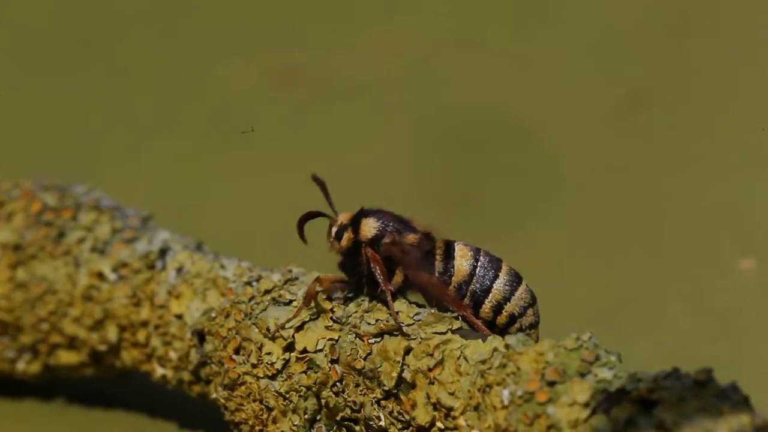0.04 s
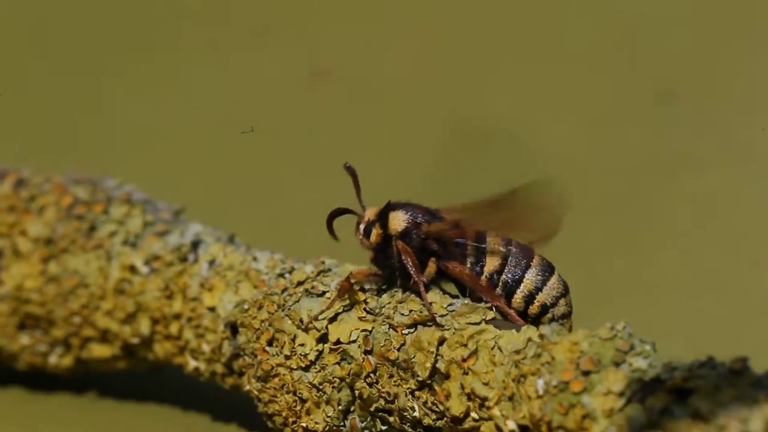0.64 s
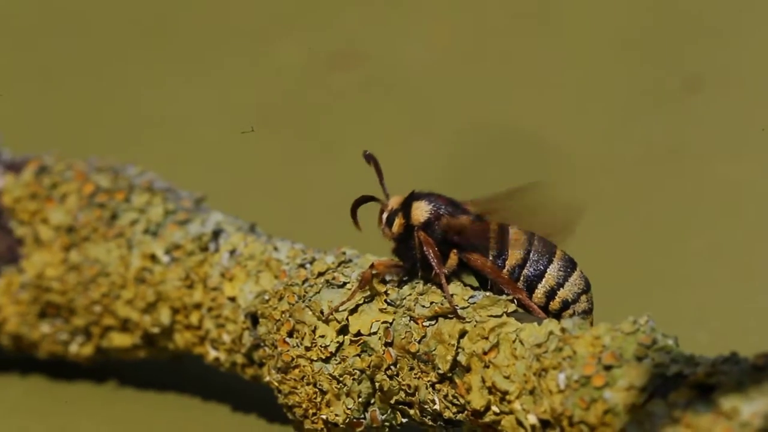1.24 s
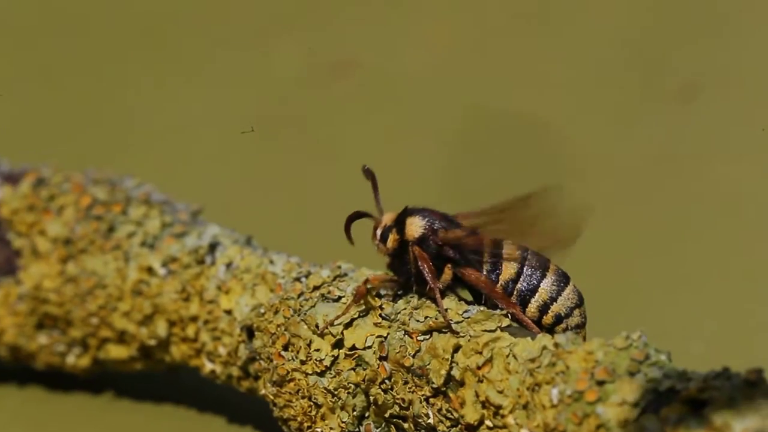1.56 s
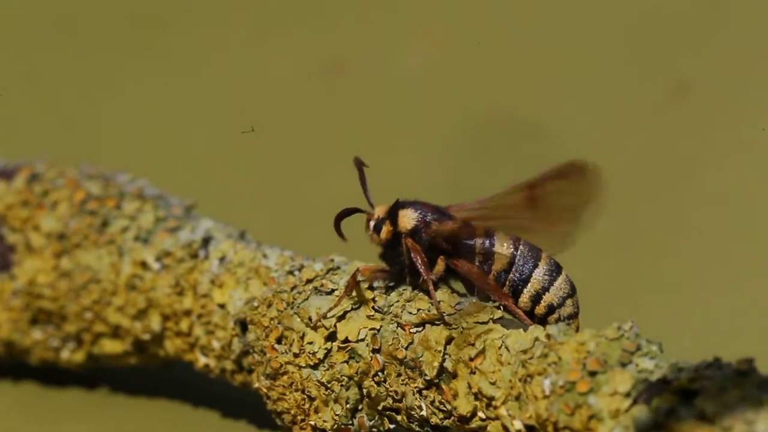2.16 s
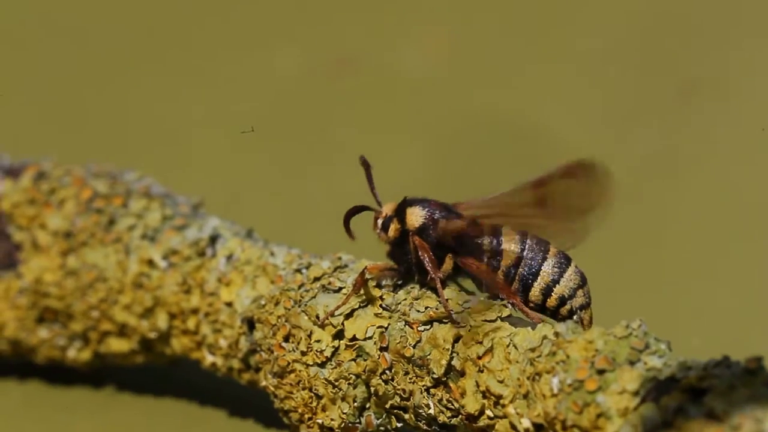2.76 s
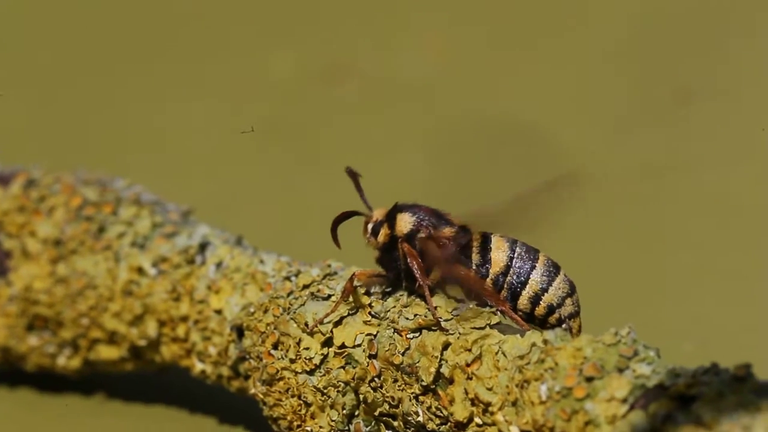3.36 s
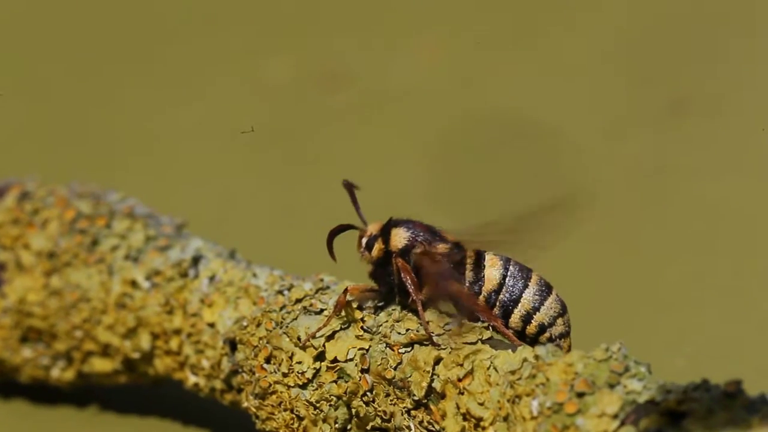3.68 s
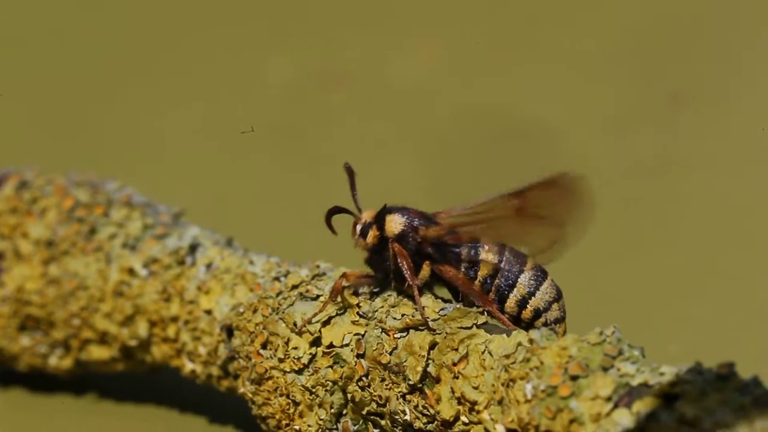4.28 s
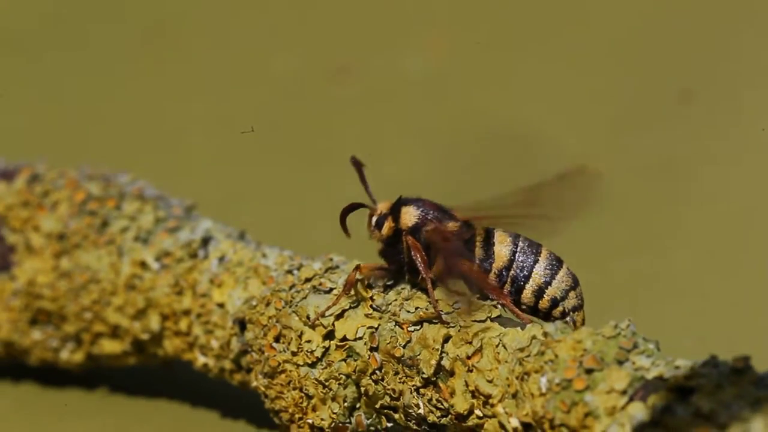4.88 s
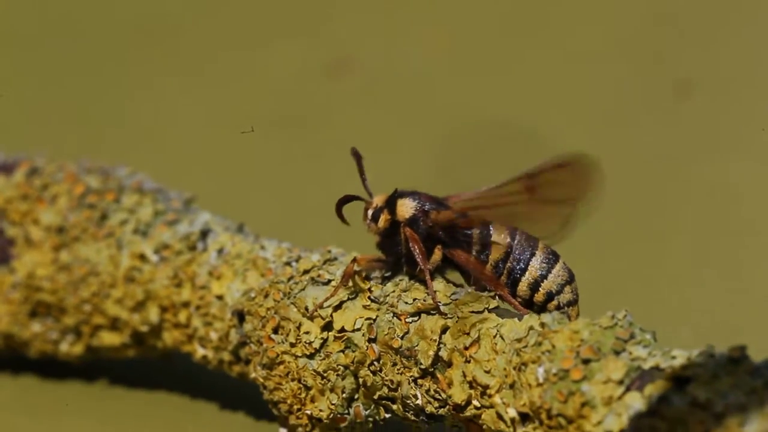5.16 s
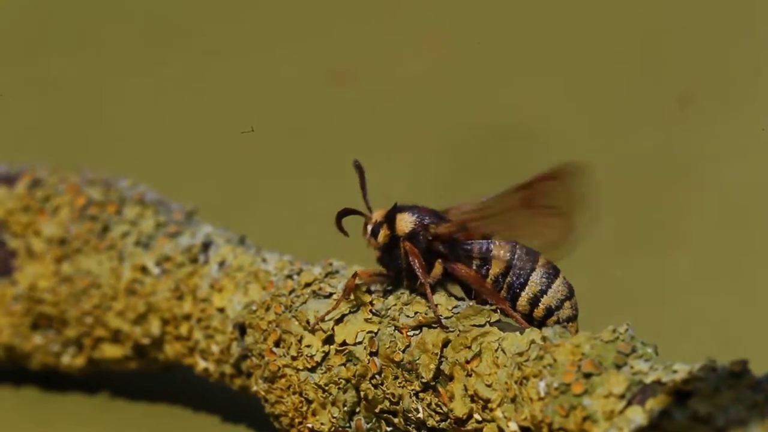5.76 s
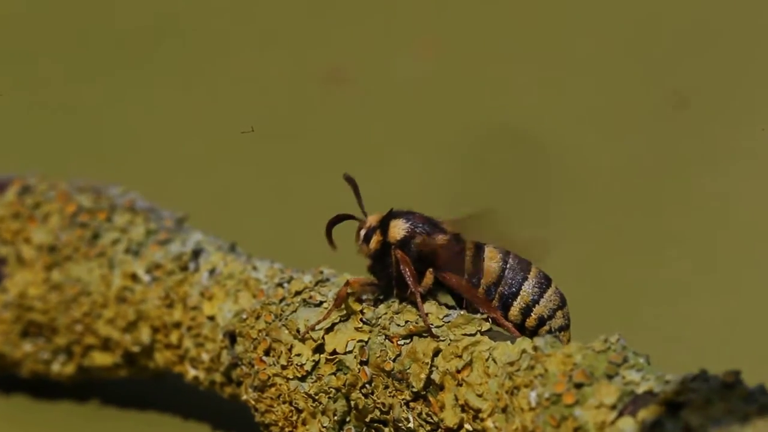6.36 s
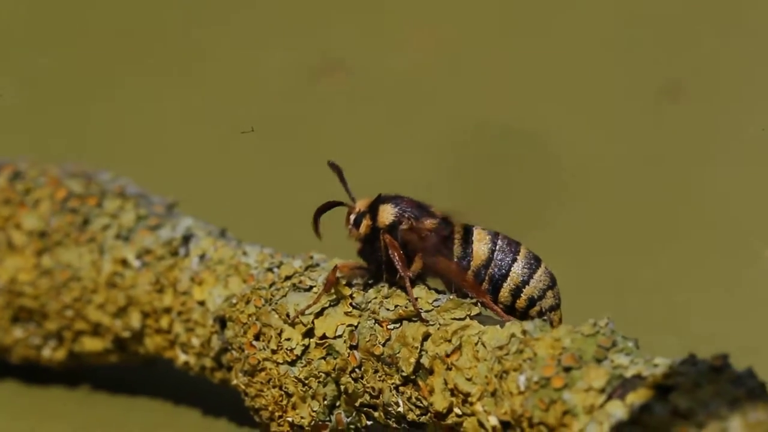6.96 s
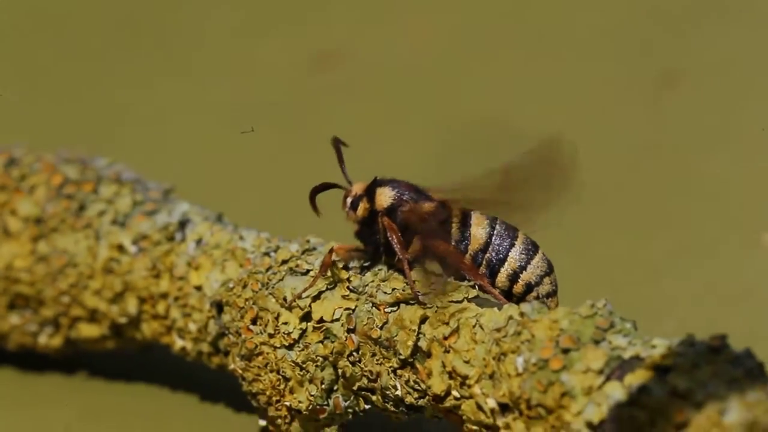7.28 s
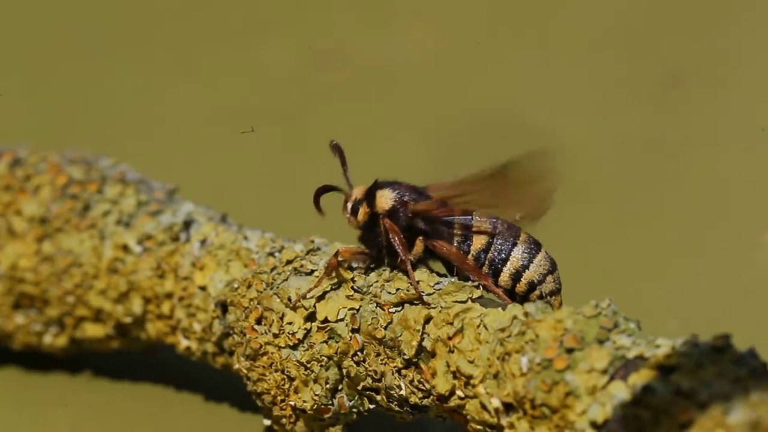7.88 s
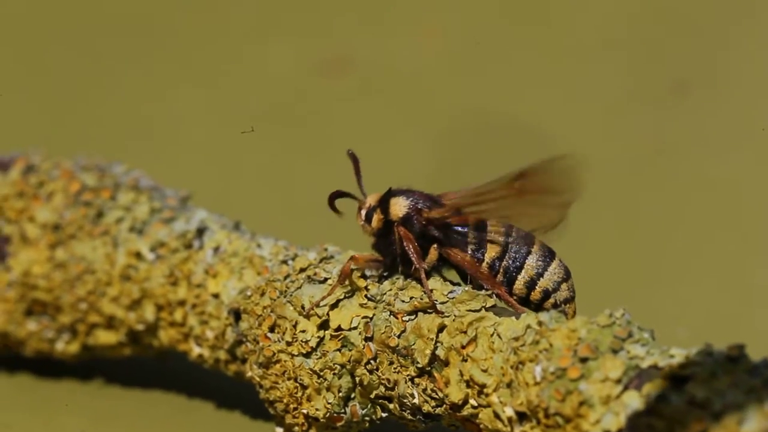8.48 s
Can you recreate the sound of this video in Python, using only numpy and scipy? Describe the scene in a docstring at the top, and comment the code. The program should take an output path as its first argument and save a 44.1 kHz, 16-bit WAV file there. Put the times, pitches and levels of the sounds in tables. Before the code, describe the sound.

A camera lens motor whirrs with a grainy texture and sharp irregular ticks over soft outdoor hiss and a faint hum.

```python
"""A camera stands in quiet open air, and its microphone mostly hears the lens. From the start a servo
forces the barrel's resonances into a grainy whirr, over hiss, a thin whine and a faint hum; uneven motor
steps set the barrel ringing in sharp ticks. Near 0.8 s wind puffs on the microphone, and a low drone
glides to its peak at 1 s and falls away. Near 3.9 s the lens settles: the ticks ring less and the
servo's whistle grows louder. Near 4.8 s two more puffs run together and the hum swells."""
import sys
import numpy as np
from scipy import signal
from scipy.fft import rfft, irfft
from scipy.io import wavfile

SR = 44100
rng = np.random.default_rng(int(sys.argv[2]) if len(sys.argv) > 2 else 0)


def output_pcm(signal):
    """Save a mono or channel-first signal as 16-bit PCM at the path in sys.argv[1].

    Samples are clipped to [-1, 1] before scaling.
    """
    pcm = np.clip(np.atleast_2d(signal).T, -1, 1) * 32767
    wavfile.write(sys.argv[1], SR, np.round(pcm).astype(np.int16))


N = 376173
TIME = np.arange(N) / SR
FREQ = np.maximum(np.arange(N // 2 + 1) * SR / N, 1)

# Barrel resonances driven by the running servo: f/Hz, bandwidth/Hz, peak spectrum level/dB (1 Hz band)
FORCED_MODES = [(270, 100, -84), (394, 164, -83), (524, 12, -96), (583, 29, -73), (605, 45, -72),
                (670.5, 85, -69), (724.2, 59.3, -70), (845.4, 50, -81), (916, 42, -89.5), (1161.5, 36, -80),
                (1237, 67, -80), (1576.5, 92, -84), (1735, 224, -94), (2260, 530, -103), (2434, 97, -94.5),
                (2632, 136, -96), (2830, 250, -94.5), (3086, 130, -96), (3220, 200, -101),
                (5610, 470, -100.5), (6550, 260, -110), (8640, 180, -106.5), (9320, 410, -108),
                (10600, 700, -108.5)]
# Moments when the servo eases off: t/s, change of effort/dB
EFFORT_DIPS = [(0.15, -4), (1.95, -3.5), (4.9, -3), (6.2, -3.5), (7.28, -7), (8.4, -6)]
# Barrel modes rung by an impact: f/Hz, level/dB, decay time T60/s
FREE_MODES = [(607.4, -41, 0.073), (670, -38.5, 0.036), (724, -32, 0.026), (831, -52.5, 0.077),
              (1161, -41.5, 0.057), (1636, -43, 0.023), (1737, -43, 0.024), (2246, -52, 0.044),
              (2427, -47, 0.032), (2578, -43, 0.026), (2880, -57, 0.027), (3051, -41, 0.051),
              (3150, -46, 0.04), (3840, -56.5, 0.022), (4808, -41, 0.031), (5020, -44.5, 0.018),
              (5527, -40.5, 0.015), (6100, -49.5, 0.022), (6480, -52, 0.02), (6980, -40.5, 0.0098),
              (7900, -50, 0.015), (8500, -46, 0.015), (8950, -43, 0.01), (9330, -41.5, 0.011),
              (10550, -36, 0.0057), (10890, -41, 0.0094), (11700, -49, 0.0047), (12950, -48.5, 0.0061),
              (14600, -56, .003)]
# Air and microphone hiss: f/Hz, spectrum level/dB (1 Hz band)
HISS_SPECTRUM = [(15, -109), (30, -101), (55, -91), (90, -95.5), (130, -90), (200, -94.5), (450, -92),
                 (1000, -101), (1400, -100), (2000, -103), (3600, -105), (7000, -107.5), (12000, -112),
                 (15500, -115)]
# Steps of the motor: t/s, relative level/dB
MOTOR_STEPS = [(0.0075, -0.4), (0.4004, 0.5), (0.4979, -11), (0.8917, -9.5), (0.9814, -11.5), (1.289, -2.5),
               (1.3188, -2.5), (1.7196, 0.5), (1.8131, -8.5), (2.5594, -1.9), (2.6483, -2), (2.7081, -1.5),
               (3.0588, -0.7), (3.2978, -1.5), (3.759, -15), (3.818, 0.2), (4.1131, 0.5), (4.1529, 0.4),
               (4.2117, 0.8), (4.4678, -0.2), (4.5367, -0.5), (4.6143, -15), (5.1871, -1), (5.6596, 0),
               (5.9445, -3), (6.5167, -1.5), (6.9002, -1.3), (7.4416, -14), (7.5798, 0), (7.8048, -0.5),
               (7.9624, 0), (7.9833, 0), (8.4692, -1), (8.4801, -0.5)]
# Wind on the microphone: t/s, half width/s, peak spectrum level/dB (1 Hz band)
WIND_PUFFS = [(0.78, 0.11, -84.5), (4.695, 0.026, -76), (4.835, 0.093, -77.5)]


def undb(db):
    """Amplitude ratio of a level: tenfold for every 20 dB."""
    return 10 ** (np.asarray(db) / 20)


def noise(density):
    """Spectral shaping: white noise filtered to the given amplitude per root Hz."""
    return irfft(rfft(rng.standard_normal(N)) * density, N) * np.sqrt(SR / 2)


def resonance(hz, width_hz):
    """Lorentzian gain curve, 1 at its centre."""
    return 1 / (1 + (2 * (FREQ - hz) / width_hz) ** 2)


def fluctuation(rate_hz):
    """Low-pass noise: a slow random variation of unit standard deviation."""
    drift = noise(resonance(0, 2 * rate_hz))
    return drift / drift.std()


def swell(peak_s, half_width_s):
    """Gaussian envelope, 1 at its peak."""
    return np.exp(-((TIME - peak_s) / half_width_s) ** 2)


def settling(t, before, after, midpoint_s=3.93, spread_s=0.15):
    """Smooth transition between two steady values as the lens settles."""
    return before + (after - before) * (1 + np.tanh((t - midpoint_s) / spread_s)) / 2


def servo(split_hz=2000, waver_db=0.63):
    """Forced vibration: random motor corrections shake the barrel, louder and brighter with effort."""
    power = sum((undb(db) * resonance(hz, width)) ** 2 for hz, width, db in FORCED_MODES)
    low_share = 1 / (1 + (FREQ / split_hz) ** 8)
    effort_db = sum(db * swell(t, half_width_s=0.3) for t, db in EFFORT_DIPS)
    effort_db -= effort_db.mean()
    whirr = noise(np.sqrt(power * low_share)) * undb(0.24 * effort_db)
    rasp = noise(np.sqrt(power * (1 - low_share))) * undb(0.49 * effort_db)
    whistle_db = settling(TIME, before=-101.5, after=-96)
    whistle = noise(resonance(hz=4780, width_hz=210)) * undb(whistle_db)
    return (whirr + rasp + whistle) * undb(waver_db * fluctuation(rate_hz=12))


def barrel_tick(ring_db, detune, lag_s=0.00129, knee_hz=6000, rise_cycles=2.6, long_t60_s=0.057):
    """Dispersion: bending waves bring the treble first, so the struck barrel's modes chirp downward."""
    hz, db, t60 = np.transpose(FREE_MODES)[:, :, None]
    arrival_s = lag_s / (1 + (hz / knee_hz) ** 4)
    age_s = np.maximum(np.arange(SR // 12) / SR - arrival_s, 0)
    build_up = 1 - np.exp(-age_s * hz / rise_cycles)  # the lows swell last
    decay = np.exp(-np.log(1000) * age_s / t60)
    ring_share = 1 / (1 + (long_t60_s / t60) ** 4)  # ring_db acts on long modes and spares the crack
    modes = np.sin(2 * np.pi * hz * (1 + detune[:, None]) * age_s)
    return np.sum(undb(db + ring_db * ring_share) * build_up * decay * modes, axis=0)


def bearing_chatter(knocks_per_s=150):
    """Shot noise: tiny random knocks of the bearings ring the barrel and give the whirr a fine grain."""
    knocks = rng.random(N) < knocks_per_s / SR
    strength = undb(rng.uniform(-32, -26, N))
    impulse_response = barrel_tick(ring_db=-3.0, detune=np.zeros(len(FREE_MODES)))
    return signal.fftconvolve(knocks * strength, impulse_response)[:N]


def electronic_whine(hz=4019, peak_db=-86, wobble_hz=3):
    """Frequency modulation: a thin tone from the electronics wanders slightly in pitch."""
    pitch_hz = hz + wobble_hz * fluctuation(rate_hz=3.5)
    return undb(peak_db) * np.sin(2 * np.pi * np.cumsum(pitch_hz) / SR)


def hiss():
    """Stationary broadband noise of the air and the microphone, weaker toward the treble."""
    hz, db = np.transpose(HISS_SPECTRUM)
    return noise(undb(np.interp(np.log(FREQ), np.log(hz), db)))


def hum(hz=120.1, wobble_hz=1.57, base_rms_db=-80, waver_db=1.5, swell_db=11):
    """Amplitude and frequency modulation: a faint low tone wavers and swells once."""
    rms_db = base_rms_db + waver_db * fluctuation(rate_hz=1)
    rms_db += swell_db * swell(peak_s=4.9, half_width_s=0.21)
    pitch_hz = hz + wobble_hz * fluctuation(rate_hz=3)
    return np.sqrt(2) * undb(rms_db) * np.sin(2 * np.pi * np.cumsum(pitch_hz) / SR)


def drone(idle_hz=21.87, top_hz=65.5, top_s=1.0, rise_s=0.42, fall_s=0.64):
    """Harmonic glide: a fundamental and its octave rise as the drone speeds up, and fall as it coasts."""
    glide_s = np.where(TIME < top_s, rise_s, fall_s)
    pitch_hz = idle_hz + (top_hz - idle_hz) / (1 + ((TIME - top_s) / glide_s) ** 2)
    phase = 2 * np.pi * np.cumsum(pitch_hz) / SR
    envelope = np.sqrt(2) * undb(-70.5) * swell(peak_s=1.24, half_width_s=0.86)
    return envelope * (np.sin(phase) + undb(-2) * np.sin(2 * phase))


def motor_steps(detune_spread=0.002):
    """Free vibration: each step strikes the barrel, and the harder the step, the more it rings."""
    ticks = np.zeros(N + SR)
    detunes = detune_spread * rng.standard_normal((len(MOTOR_STEPS), len(FREE_MODES)))
    for (t, db), detune in zip(MOTOR_STEPS, detunes):
        ring_db = db + settling(t, before=5.5, after=0.5)
        tick = undb(db) * barrel_tick(ring_db, detune)
        start = int(t * SR)
        ticks[start:start + len(tick)] += tick
    return ticks[:N]


def wind():
    """Turbulence: puffs of wind on the microphone make brief swells of low rumble."""
    envelope = sum(undb(db) * swell(t, half_width_s) for t, half_width_s, db in WIND_PUFFS)
    return envelope * noise(resonance(hz=110, width_hz=150))


def scene():
    """Superposition: the sounds of the lens and the open air add at one microphone."""
    lens = servo() + bearing_chatter()
    return (lens + electronic_whine() + hiss() + hum() + drone() + motor_steps() + wind())[None]


def record(dry):
    """Band limiting: the camera's steep low-pass filter cuts the treble above 15.7 kHz."""
    low_pass = signal.ellip(N=10, rp=0.1, rs=70, Wn=15700, fs=SR, output="sos")
    return signal.sosfilt(low_pass, dry)


dry = scene()
out = record(dry)
output_pcm(out)
```